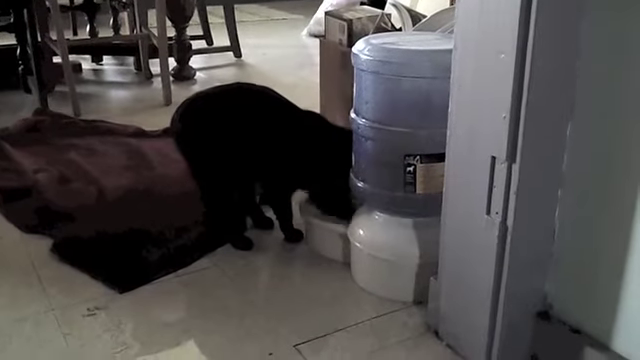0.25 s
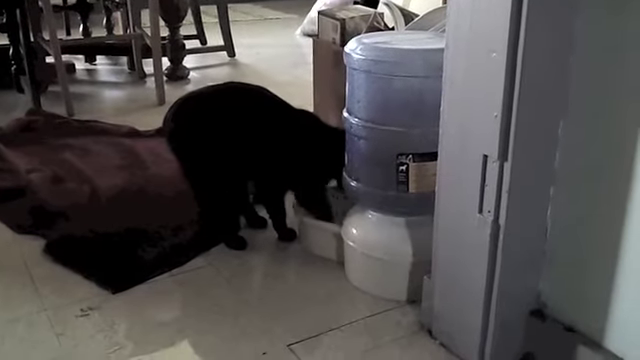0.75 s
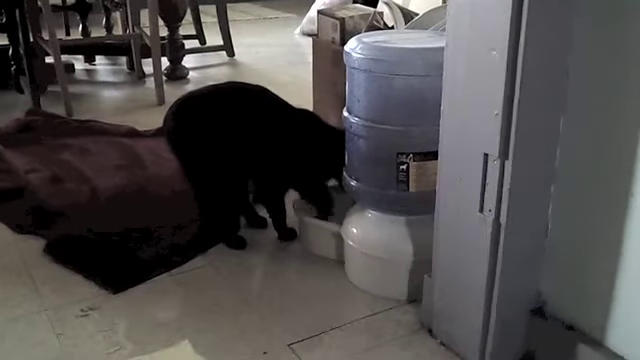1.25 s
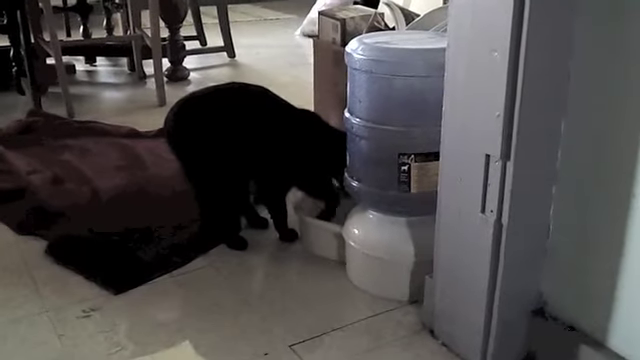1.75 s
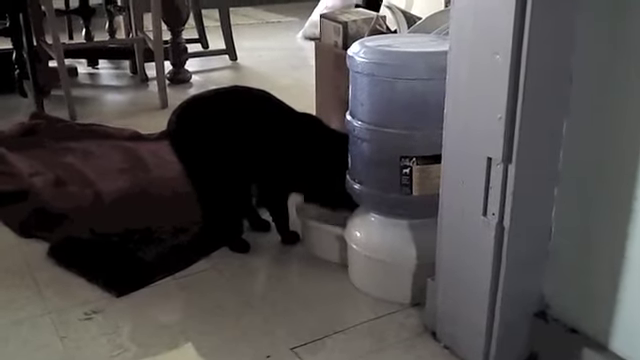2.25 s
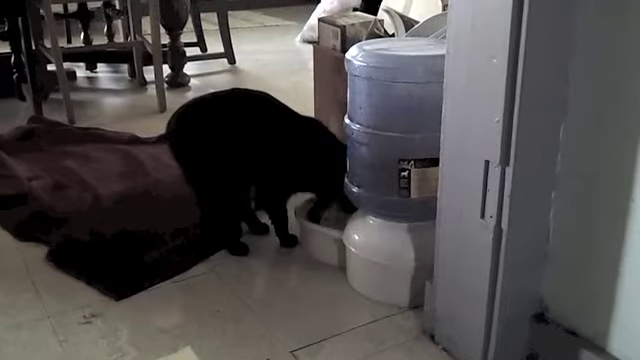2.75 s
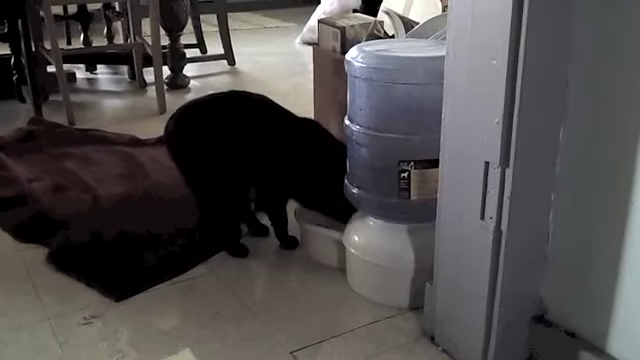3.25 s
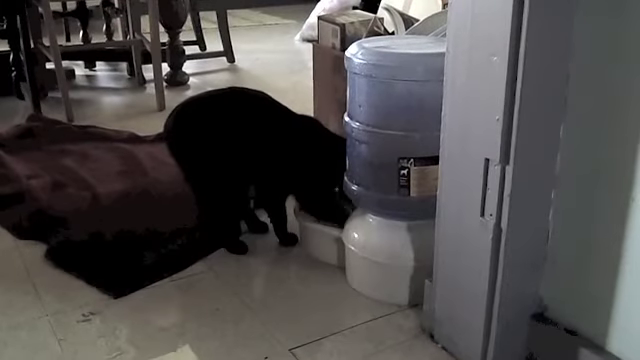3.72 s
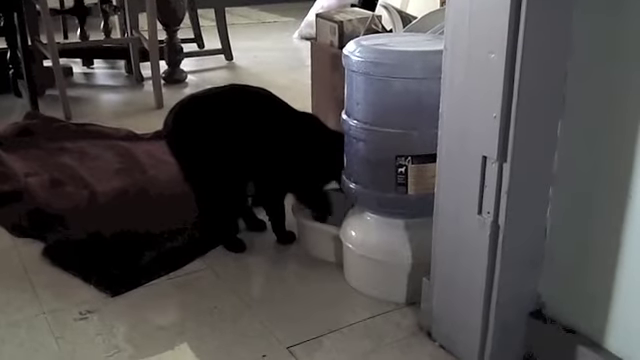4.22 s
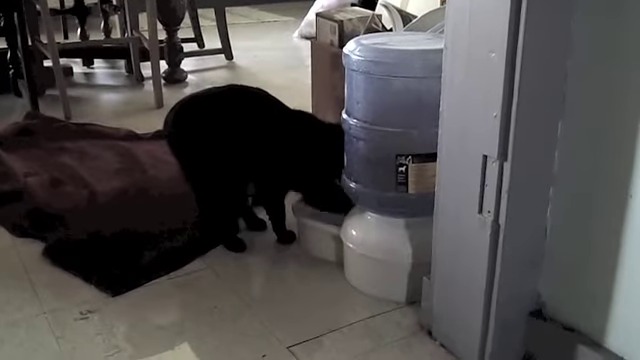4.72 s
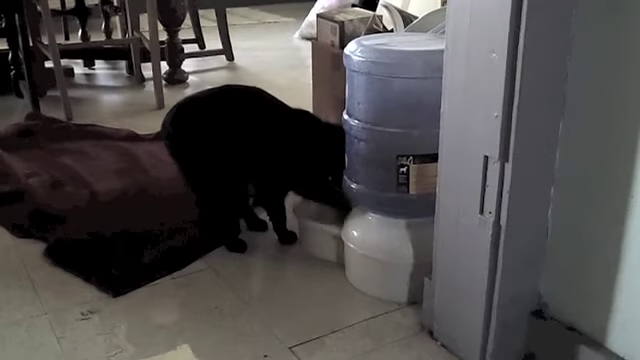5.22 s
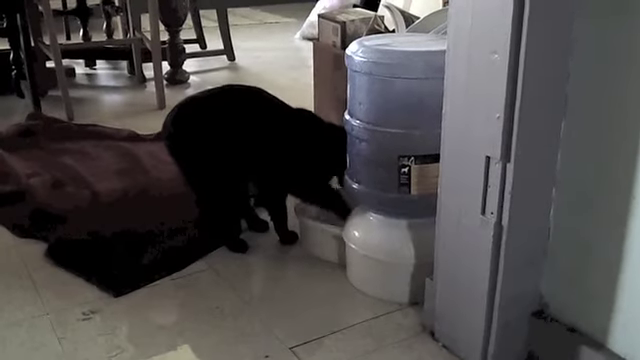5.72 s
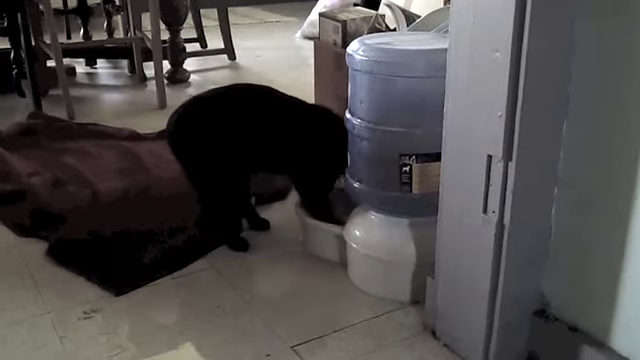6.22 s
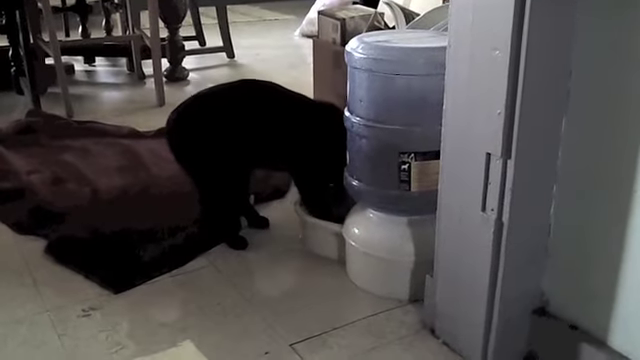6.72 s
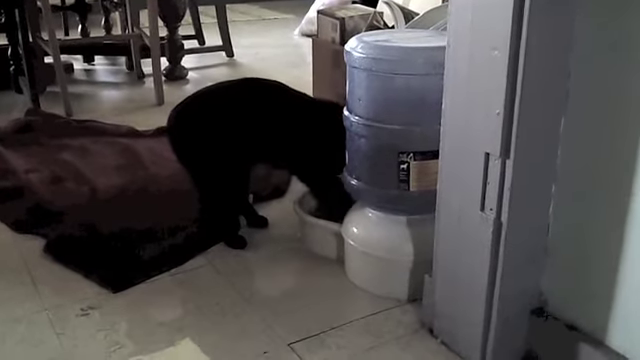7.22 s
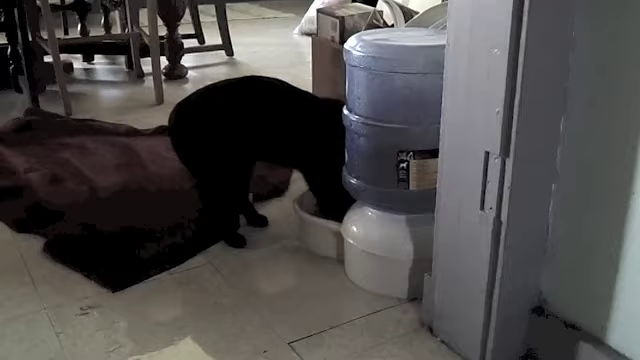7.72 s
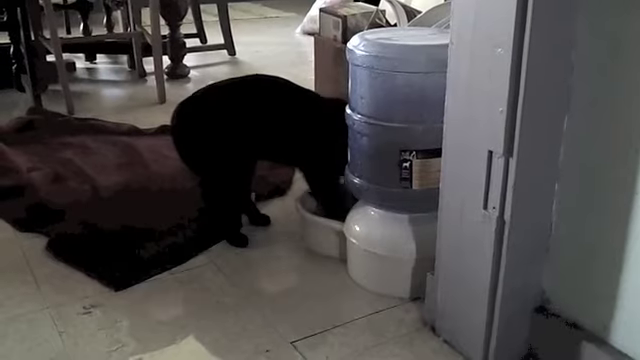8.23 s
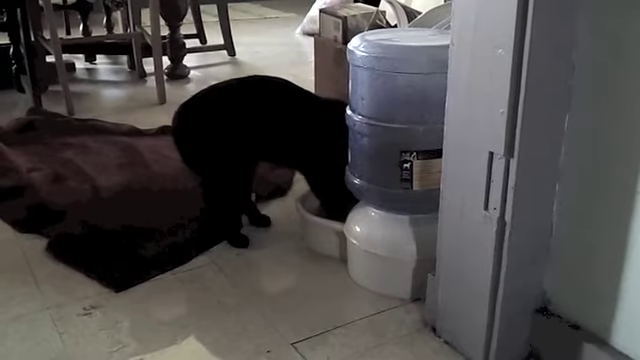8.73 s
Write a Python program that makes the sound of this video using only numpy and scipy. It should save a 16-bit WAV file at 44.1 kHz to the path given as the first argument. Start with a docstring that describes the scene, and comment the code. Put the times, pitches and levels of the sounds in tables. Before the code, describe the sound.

A cat paws at the water in a plastic dispenser bowl, making small irregular splashes, bubbly plops, drips and soft lapping. Three times its wet paw gives a brief squeak against the plastic. The splashing thins out, then picks up again, and air glugs into the bottle near the end. The microphone is close, in a small hard-walled kitchen with faint rumble and hiss.

```python
"""A cat paws at the water in the plastic bowl of a gravity water dispenser on a kitchen floor.
Each dip traps bubbles that plop, throws a little spray and sets the water lapping; three times the wet
paw rubs along the bowl. Near the end air glugs up into the bottle. One microphone, close to the bowl:
the small hard room answers behind the direct sound, over a faint rumble and hiss."""
import sys
import numpy as np
from scipy import signal
from scipy.fft import rfft, irfft, next_fast_len
from scipy.io import wavfile
from scipy.ndimage import uniform_filter1d

SR = 44100
rng = np.random.default_rng(int(sys.argv[2]) if len(sys.argv) > 2 else 0)


def generate_wav(sig):
    """Save sig (samples, or channels by samples) to the path in sys.argv[1] as 16-bit PCM at SR."""
    pcm = np.round(np.clip(np.atleast_2d(sig).T, -1, 1) * 32767).astype(np.int16)
    wavfile.write(sys.argv[1], SR, pcm)


N = 395559

# the paw breaks the surface: (time [s], relative level [dB], spray centre [Hz])
SPLASHES = [(0.3242, -40, 3500), (0.5384, -22.5, 1940), (0.5937, -33.5, 1800), (.7557, -37, 1920),
            (1.2509, -41, 1880), (1.3857, -36.5, 4040), (1.55, -35.5, 4930), (1.658, -46.5, 3300),
            (1.7925, -30, 1980), (1.809, -31, 1980), (1.983, -33, 1840), (2.044, -33.5, 1920),
            (2.2907, -38, 3000), (2.7063, -28.5, 1940), (2.953, -36.5, 2000), (3.1702, -40, 1980),
            (3.2866, -38, 2140), (3.3, -33.5, 1850), (3.613, -29, 3060), (3.8665, -40.5, 4980),
            (4.1692, -38.5, 1820), (4.1767, -33, 2040), (4.589, -34, 3460), (4.6414, -35.5, 1820),
            (4.7042, -34, 1860), (5.012, -39, 1840), (5.119, -39.5, 2150), (5.4272, -35, 4200),
            (5.5555, -42, 1950), (5.897, -38, 3020), (6.6388, -42, 2930), (7.479, -47, 3870),
            (7.913, -38.5, 1800), (8.1405, -31.5, 1830), (8.4947, -30, 3280), (8.5093, -26.5, 2400)]
TYPICAL_SPLASH_DB, TYPICAL_SPLASH_HZ = -33, 2000


def from_db(db):
    """Decibels to gain."""
    return 10 ** (np.asarray(db) / 20)


def rms_one(x):
    """Scale to rms 1."""
    return x / np.sqrt(np.mean(x ** 2) + 1e-20)


def even(x, size):
    """Hold the rms near 1 over windows of size samples."""
    return x / np.sqrt(np.abs(uniform_filter1d(x ** 2, size)) + 1e-12)


def clock(seconds):
    """Time axis of a short sound."""
    return np.arange(int(seconds * SR) + 2) / SR


def add(out, start, sound):
    """Mix a sound in at a time."""
    i = max(int(start * SR), 0)
    out[i:i + len(sound)] += sound[:max(N - i, 0)]


def swell_and_die(t, swell, t60):
    """Envelope that builds up smoothly and rings down; top 1."""
    envelope = (1 - np.exp(-(t / swell) ** 2)) * np.exp(-np.log(1000) * t / t60)
    return envelope / (envelope.max() + 1e-12)


def gains(table):
    """A smooth gain curve for each level column of (time [s], level [dB], ...), silent outside it."""
    t = np.arange(N) / SR
    times, *levels = np.transpose(table)
    inside = (t >= times[0]) & (t <= times[-1])
    curves = [inside * from_db(np.interp(t, times, level)) for level in levels]
    return uniform_filter1d(curves, size=400, axis=1)


def at_hz(spectrum, hz):
    """Gain of a spectrum at given frequencies."""
    known_hz, level = np.transpose(spectrum)
    return from_db(np.interp(np.log(hz + 1), np.log(known_hz), level))


def noise(spectrum):
    """Steady noise of a given colour, rms 1."""
    size = next_fast_len(N)
    colour = at_hz(spectrum, np.fft.rfftfreq(size, 1 / SR))
    return rms_one(irfft(rfft(rng.standard_normal(size)) * colour, size)[:N])


def resonate(x, hz, width):
    """One resonance, gain 1 on top."""
    r = np.exp(-np.pi * width / SR)
    feedback = [1, -2 * r * np.cos(2 * np.pi * hz / SR), r * r]
    return signal.lfilter(np.array([1, 0, -1]) * (1 - r * r) / 2, feedback, x)


def body(modes):
    """A body's modes under a dense random drive; filtering twice keeps the valleys dark."""
    drive = rng.standard_normal(N)
    ringing = sum(from_db(db) * resonate(resonate(drive, hz, 2 * width), hz, 2 * width)
                  for hz, width, db in modes)
    return even(ringing, size=1500)


def swarm(spectrum, per_s, cycles, spread_db, bands=30):
    """Countless small bubbles of random size, each ringing for some cycles; rms 1."""
    onsets = np.flatnonzero(rng.random(N) < per_s / SR)
    strength, polarity, pitch = rng.random((N, 3))[onsets].T
    kicks = from_db(spread_db * np.minimum(-np.log(1 - strength), 3)) * np.sign(polarity - .5)
    out = np.zeros(N)
    for band, hz in enumerate(np.geomspace(spectrum[0][0], spectrum[-1][0], bands)):
        clicks = np.full(N, 1e-18)
        clicks[onsets] += kicks * ((pitch * bands).astype(int) == band)
        out += at_hz(spectrum, hz) * resonate(clicks, hz, np.log(1000) / np.pi * hz / cycles)
    return rms_one(out)


def room_tone(floor_db=-61.5, flutter_db=-70.5, flutter_hz=30, centre_hz=3800, width_hz=2600):
    """Room rumble and microphone hiss; a band of the hiss pulses faintly."""
    # colour of the rumble and hiss: (frequency [Hz], relative level [dB])
    floor_colour = [(15, -12), (25, -20.5), (86, -0.5), (240, 0), (267, -0.5), (389, -5), (433, -3.5),
                    (804, -10), (1450, -18.5), (2300, -13.5), (2770, -18.5), (3930, -12.5), (4380, -21.5),
                    (6920, -16.5), (15500, -19)]
    pulse = .5 + .5 * np.cos(2 * np.pi * flutter_hz * np.arange(N) / SR)
    band = resonate(resonate(rng.standard_normal(N), centre_hz, width_hz), centre_hz, width_hz)
    return from_db(floor_db) * noise(floor_colour) + from_db(flutter_db) * rms_one(band * pulse)


def unrest(t60, follows=0.37, swell=0.0062):
    """Motion left in the water: each splash adds its share, which dies away; 1 after a typical splash."""
    power, t = np.zeros(N), clock(1)
    for s, db, _ in SPLASHES:
        motion = from_db(follows * (db - TYPICAL_SPLASH_DB)) * swell_and_die(t, swell, t60)
        add(power, s, motion ** 2)
    return np.sqrt(power)


def stirred_water(slosh_lap_db=-6.0, slosh_fizz_db=-14.0, unrest_db=-63.5):
    """The water laps and fizzes with its slow sloshing, and more just after each splash."""
    # slow sloshing in the bowl: (time [s], relative level [dB])
    slosh_levels = [(0.0, -48.5), (0.4, -57.5), (0.8, -51.5), (1.1, -57), (2.55, -53.5), (2.65, -54.5),
                    (3.02, -60.5), (3.25, -58), (3.42, -69), (3.7, -49.5), (4.05, -63), (4.27, -61),
                    (4.4, -56.5), (5.04, -54.5), (5.62, -59), (6.0, -68), (6.37, -70), (6.64, -63),
                    (7.39, -70.5), (7.92, -60.5), (8.09, -54.5), (8.54, -54), (8.89, -60), (8.97, -70)]
    # bubbles of the lapping: (frequency [Hz], relative level [dB])
    lap_colour = [(130, -9), (220, -3.5), (400, -5.5), (700, -9.5), (1200, 2.5), (1800, -4), (2400, -13.5),
                  (3200, -13)]
    # finer bubbles of the fizz: (frequency [Hz], relative level [dB])
    fizz_colour = [(1800, -21), (2500, 0), (3100, 19), (4300, 8), (5500, 9), (7500, -11), (12000, -53)]
    slosh, = gains(slosh_levels)
    lap_gain = np.hypot(from_db(slosh_lap_db) * slosh, from_db(unrest_db) * unrest(t60=0.36))
    fizz_gain = np.hypot(from_db(slosh_fizz_db) * slosh, from_db(unrest_db) * unrest(t60=0.3))
    lapping = swarm(lap_colour, per_s=750, cycles=30, spread_db=3.5)
    fizzing = swarm(fizz_colour, per_s=800, cycles=42, spread_db=5.0)
    return lap_gain * lapping + fizz_gain * fizzing


def spatter(droplets, start, samples, hz, octaves):
    """The droplets of one size range, from a given moment on; rms 1."""
    edges = np.clip(hz * 2 ** (np.array([-octaves, octaves]) / 2), 100, .45 * SR)
    stretch = np.take(droplets, int(start * SR) + np.arange(samples), mode="wrap")
    band = signal.sosfilt(signal.butter(2, edges, "band", fs=SR, output="sos"), stretch)
    return even(band, size=900)


def swishes(droplets, gain_db=0.5, octaves=1.52):
    """Water tears softly around the moving paw, swelling and fading with the stroke."""
    # paw strokes: (loudest moment [s], relative level [dB], half length [s], centre [Hz])
    strokes = [(0.06, -54.5, 0.061, 2680), (0.136, -54, 0.022, 1290), (0.338, -42, .009, 3300),
               (0.561, -43, 0.023, 1980), (0.78, -49.5, 0.019, 3220), (1.023, -57.5, 0.019, 2600),
               (1.266, -63, 0.0058, 2300), (1.468, -61.5, 0.017, 3220), (1.622, -53, 0.01, 2380),
               (1.748, -58, .025, 3000), (1.827, -55.5, 0.053, 1758), (2.257, -52, 0.046, 2470),
               (2.606, -54.5, .015, 2550), (2.727, -53.5, 0.029, 2800), (2.961, -45.5, 0.01, 5900),
               (3.223, -53.5, 0.03, 2800), (3.588, -49.5, .015, 2800), (3.997, -55, 0.034, 2400),
               (4.315, -53, 0.042, 2330), (4.606, -55.5, 0.022, 3670), (4.704, -56.5, 0.031, 2360),
               (4.961, -61, 0.01, 12500), (5.047, -55, 0.061, 2240), (5.25, -61.5, .017, 3300),
               (5.61, -54, 0.041, 2360), (6.645, -53, 0.013, 2230), (7.919, -47.5, 0.0064, 1700),
               (8.141, -55, 0.008, 3960), (8.29, -57.5, 0.018, 2620), (8.392, -49.5, 0.016, 2840),
               (8.506, -57, 0.018, 2400), (8.797, -58.5, 0.012, 2170), (8.872, -61, 0.014, 4000)]
    out, t = np.zeros(N), clock(.3)
    middle = t[-1] / 2
    for s, db, half_length, hz in strokes:
        envelope = np.exp(-((t - middle) / half_length) ** 2 / 2)
        add(out, s - middle, from_db(db + gain_db) * envelope * spatter(droplets, s, len(t), hz, octaves))
    return out


def bubble(hz, t60, swell_cycles=1.29):
    """A trapped bubble rings; its pitch climbs as it nears the surface, faster the smaller it is."""
    swell = swell_cycles / hz
    t = clock(t60 + 2 * swell)
    octaves_per_s = 2.93 * (hz / 1400) ** 2
    pitch = hz * 2 ** np.minimum(octaves_per_s * t, .5)
    return np.sin(2 * np.pi * np.cumsum(pitch) / SR) * swell_and_die(t, swell, t60)


def plops(gain_db=1.0, satellite_db=-10.5, satellite_cycles=16, count=4):
    """The larger bubbles; each sheds a few weaker ones of other sizes just after it closes."""
    # single bubbles in the bowl: (time [s], starting pitch [Hz], relative peak [dB], ring t60 [s])
    bubbles = [(0.1151, 1430, -32.5, .014), (.175, 3250, -41.5, 0.024), (0.1916, 4720, -42.5, .011),
               (0.2812, 1237, -36, 0.023), (0.3235, 1320, -34.5, 0.016), (0.325, 3560, -32, 0.01),
               (0.341, 3000, -42, .025), (0.35, 1366, -31, 0.02), (0.396, 1750, -40, 0.012),
               (.538, 1426, -23.5, .03), (.549, 1448, -22.5, 0.029), (.542, 895, -36, 0.0082),
               (.564, 1380, -36, .02), (.756, 4400, -41, 0.0056), (.805, 4200, -40, 0.0074),
               (.856, 3000, -35.5, 0.018), (.864, 3460, -37, .016), (.889, 2130, -38, 0.014),
               (.903, 6160, -47.5, .009), (.942, 840, -40.5, 0.042), (.974, 840, -38.5, 0.0052),
               (1.008, 1280, -42, 0.013), (1.2885, 1810, -39.5, 0.011), (1.356, 2900, -40, .018),
               (1.359, 1690, -37, .004), (1.396, 4360, -44, .011), (1.513, 1950, -48.5, 0.06),
               (1.5519, 5150, -34, 0.011), (1.5542, 1130, -36.5, 0.0088), (1.793, 1370, -27, 0.011),
               (1.7948, 1020, -21, 0.014), (1.845, 924, -33, 0.0057), (1.8697, 4700, -49, .015),
               (1.959, 3150, -41, 0.0063), (1.984, 564.5, -35.5, 0.11), (2.047, 1416, -31.5, 0.04),
               (2.2024, 2900, -39, 0.014), (2.21, 3320, -36, 0.014), (2.2644, 1680, -29.5, 0.02),
               (2.2883, 1850, -37, 0.032), (2.293, 3150, -33.5, .008), (2.294, 4570, -44, .01),
               (2.4256, 1280, -46, 0.012), (2.434, 695, -40.5, 0.017), (2.7137, 1050, -31.5, 0.0095),
               (2.749, 1960, -38.5, 0.017), (2.7807, 2600, -31.5, 0.0036), (2.92, 4800, -41, 0.0068),
               (2.945, 1240, -26.5, 0.0073), (2.9456, 1890, -19, 0.012), (2.9594, 7700, -50, 0.0097),
               (3.294, 5770, -49, .012), (3.302, 1390, -31, 0.012), (3.611, 1238, -38, .038),
               (3.6162, 3130, -30, 0.01), (3.7402, 1350, -39, .033), (3.746, 816, -39.5, 0.031),
               (3.8386, 1143, -29, 0.012), (3.87, 5000, -39, 0.0072), (3.879, 860, -39, 0.014),
               (3.989, 1274, -38, 0.044), (3.997, 4050, -41.5, 0.02), (4.1783, 2980, -33, 0.019),
               (4.1783, 1485, -23.5, 0.0043), (4.2573, 3300, -42.5, .01), (4.262, 4650, -46, 0.0087),
               (4.3784, 5300, -46, .008), (4.428, 1820, -47, 0.029), (4.491, 1990, -49, 0.039),
               (4.556, 1640, -43.5, .025), (4.583, 567, -28.5, 0.064), (4.6124, 1460, -36.5, 0.078),
               (4.6836, 1340, -41, 0.039), (4.7065, 1526, -34.5, 0.026), (4.719, 1380, -27, 0.012),
               (4.8265, 1310, -48, .012), (4.948, 2940, -44.5, .019), (4.9608, 1290, -33, .016),
               (4.9818, 1910, -38, .015), (5.011, 1680, -27, 0.021), (5.1188, 2020, -32.5, 0.041),
               (5.143, 1660, -40, 0.037), (5.2578, 3160, -38, 0.011), (5.3434, 1160, -55, 0.023),
               (5.4273, 3900, -34.5, 0.012), (5.674, 4470, -48, .012), (5.7014, 1760, -31.5, 0.0053),
               (5.8562, 3460, -41, .006), (6.692, 1630, -43, .028), (6.756, 593, -44.5, .016),
               (6.7824, 990, -43.5, .038), (7.622, 1720, -54, .026), (7.866, 4100, -39.5, 0.0055),
               (7.9177, 1260, -35, .012), (7.925, 1820, -33, .009), (7.993, 1086, -28, 0.041),
               (8.141, 1230, -28, 0.027), (8.157, 1160, -29.5, 0.015), (8.191, 1140, -38, 0.0064),
               (8.2743, 6700, -40, 0.0042), (8.281, 2950, -42.5, .009), (8.329, 3180, -36.5, .018),
               (8.37, 1250, -44, 0.049), (8.3924, 3000, -27, 0.0034), (8.3932, 4360, -35.5, 0.013),
               (8.459, 736, -38.5, 0.0095), (8.499, 3440, -30, .005), (8.5154, 1255, -28.5, .014),
               (8.547, 600, -31.5, 0.007), (8.7472, 4660, -39.5, 0.0081)]
    out = np.zeros(N)
    for (s, hz, db, t60), satellites in zip(bubbles, rng.random((len(bubbles), count, 3))):
        add(out, s, from_db(db + gain_db) * bubble(hz, t60))
        for delay, pitch, weakness in satellites:
            satellite_hz = max(hz, 900) * 2 ** (1.4 * pitch - .6)
            satellite = bubble(satellite_hz, satellite_cycles / satellite_hz)
            add(out, s + .002 + .022 * delay ** 2, from_db(db + satellite_db - 6 * weakness) * satellite)
    return out


def splashes(droplets, spray_db=-10.0, octaves=2.45, typical_knock_db=-50):
    """The paw throws a short burst of spray and hands a dull knock to the bowl."""
    # the bowl's knock: (frequency [Hz], relative level [dB])
    knock_colour = [(30, -50), (70, -28), (130, -0.5), (220, 4.5), (400, 1), (800, 0.5), (1600, -7),
                    (4000, -60)]
    out, t, knock_noise = np.zeros(N), clock(.2), noise(knock_colour)
    for s, db, hz in SPLASHES:
        spray = spatter(droplets, s, len(t), hz, octaves) * swell_and_die(t, swell=0.0016, t60=0.054)
        knock = np.take(knock_noise, int(s * SR) + np.arange(len(t)), mode="wrap")
        knock *= swell_and_die(t, swell=0.003, t60=0.14)
        # the knock grows more slowly than the spray and is weaker under fine spray
        knock_db = typical_knock_db + 0.86 * (db - TYPICAL_SPLASH_DB) - 5 * np.log2(hz / TYPICAL_SPLASH_HZ)
        add(out, s, from_db(db + spray_db) * spray + from_db(knock_db) * knock)
    return out


def drips(level_db=-53.0, spread_db=3.0, longest_fall_s=.28, low_hz=2800, high_hz=6200, cycles=45):
    """A drop thrown up by each splash falls back a moment later with a tiny chirp."""
    out = np.zeros(N)
    for (s, _, _), (delay, pitch, strength) in zip(SPLASHES, rng.random((len(SPLASHES), 3))):
        hz = low_hz * (high_hz / low_hz) ** pitch
        db = level_db + spread_db * (2 * strength - 1)
        add(out, s + longest_fall_s * delay, from_db(db) * bubble(hz, cycles / hz))
    return out


def gurgles(flutter_hz=110):
    """An air pocket rings, fed unevenly by the moving water, and glides as it shrinks or grows."""
    # trapped air: (time [s], length [s], first pitch [Hz], last pitch [Hz], level [dB])
    pockets = [(1.041, 0.053, 1100, 814, -54.5), (1.434, 0.078, 820, 1510, -53),
               (2.247, 0.052, 601, 660, -44), (2.367, 0.033, 780, 895, -53),
               (2.904, 0.037, 1260, 1400, -50), (5.284, 0.082, 1380, 1066, -53.5),
               (6.74, 0.0204, 520, 616, -49.5), (8.609, 0.086, 420.5, 290, -46.5),
               (8.785, 0.069, 2080, 2530, -56)]
    out = np.zeros(N)
    for s, length, first_hz, last_hz, db in pockets:
        t = clock(length)
        phase = 2 * np.pi * np.cumsum(first_hz * (last_hz / first_hz) ** (t / length)) / SR
        feed = uniform_filter1d(rng.standard_normal((2, SR)), int(SR / flutter_hz), axis=1)[:, :len(t)]
        note = rms_one(feed[0] * np.cos(phase) + feed[1] * np.sin(phase))
        add(out, s, from_db(db) * note * np.sin(np.pi * t / length))
    return out


def rub_envelope(fall_db_per_s, late_s=0, rise_db_per_s=400):
    """The pad grips, holds and lets go, once for every rub."""
    # paw on the bowl's wall: (time of grip [s], relative level [dB], hold [s])
    rubs = [(2.524, -39, 0.045), (3.442, -39.5, 0.04), (8.001, -40.5, 0.044)]
    out, t = np.zeros(N), np.arange(N) / SR - late_s
    for s, db, hold in rubs:
        attack_db = rise_db_per_s * np.clip(s - t, 0, 1)
        release_db = fall_db_per_s * np.clip(t - s - hold, 0, 2)
        out += from_db(db - attack_db - release_db)
    return out


def rubbing(low_db=-0.5, high_db=-3.0, rasp_db=-6.5):
    """The wet pad sticks and slips on the plastic: two wavering notes, and a rasp as it slides off."""
    # the two notes of the rubbed wall: (frequency [Hz], width [Hz], relative level [dB])
    low_note, high_note = [(671, 24, 2.5), (520, 42, -17), (860, 48, -12.5)], [(1030, 42, 0)]
    # higher modes of the bowl: (frequency [Hz], width [Hz], relative level [dB])
    bowl_modes = [(1230, 250, 0.5), (1390, 160, -27), (1950, 132, 1), (2300, 130, -10)]
    squeak = from_db(low_db) * body(low_note) + from_db(high_db) * body(high_note)
    rasp = from_db(rasp_db) * body(bowl_modes)
    return rub_envelope(fall_db_per_s=314) * squeak + rub_envelope(fall_db_per_s=90, late_s=0.0093) * rasp


def step(start_s=5.975, hz=58, peak_db=-59):
    """A soft low thud as the cat shifts its weight."""
    out, t = np.zeros(N), clock(.3)
    thud = np.sin(2 * np.pi * hz * t) * swell_and_die(t, swell=0.013, t60=.2)
    add(out, start_s, from_db(peak_db) * thud)
    return out


def glug(churn_db=2.0):
    """A large bubble pulses as it enters the bottle; the water churns behind it."""
    # air entering the bottle: (time [s], bubble level [dB], relative churn level [dB])
    glug_levels = [(8.54, -60, -62), (8.552, -48, -44), (8.562, -51, -55), (8.586, -74, -53.5),
                   (8.614, -42.5, -42.5), (8.776, -47.5, -62), (8.798, -82, -72), (8.874, -63, -54.5),
                   (8.93, -87, -84)]
    # note of the large bubble: (time [s], pitch [Hz])
    glug_pitch = [(8.55, 215.4), (8.62, 186.6), (8.66, 264), (8.70, 224), (8.74, 214), (8.78, 235)]
    # the bottle and the water in it: (frequency [Hz], width [Hz], relative level [dB])
    bottle_modes = [(140, 46, 0.5), (290, 92, 2), (388, 17, -4), (615, 58, 4.5), (791, 32, 5.5),
                    (1100, 120, -7.5), (2050, 170, -7.5)]
    bubble_gain, churn_gain = gains(glug_levels)
    hz = np.interp(np.arange(N) / SR, *np.transpose(glug_pitch))
    note = np.sqrt(2) * np.sin(2 * np.pi * np.cumsum(hz) / SR)
    return bubble_gain * note + from_db(churn_db) * churn_gain * body(bottle_modes)


def kitchen(x, near_db=-6.0, near_t60=0.066, tail_db=-10.0, tail_t60=0.24, bass_hz=200, treble_hz=5500):
    """At the microphone: direct sound, scatter from the corner by the bowl, reflections and room tail."""
    # floor, door and walls: (delay [s], relative level [dB])
    reflections = [(.007, -25.5), (0.014, -8), (0.016, -19.5), (.031, -16)]
    t = clock(.6)
    response = np.zeros(len(t))
    arrivals = [(0, near_db, 0.0027, near_t60), (0, tail_db, 0.028, tail_t60)]
    arrivals += [(delay, db, .0002, .004) for delay, db in reflections]
    for delay, db, swell, t60 in arrivals:
        scatter = rng.standard_normal(len(t)) * swell_and_die(np.maximum(t - delay, 0), swell, t60)
        response += from_db(db) * scatter / np.linalg.norm(scatter)
    # bass escapes through the doorway, treble is soaked up
    response = signal.lfilter(*signal.butter(1, [bass_hz, treble_hz], "band", fs=SR), response)
    return x + signal.fftconvolve(x, response)[:N]


def scene():
    """The dispenser sounds through the kitchen, with the cat's step and the room tone added; mono."""
    # droplets in the spray and the paw's wake: (frequency [Hz], relative level [dB])
    droplet_colour = [(600, 10), (1500, 6.5), (3500, 2.5), (5200, -5), (7000, -13), (14000, -21)]
    spray = swarm(droplet_colour, per_s=4000, cycles=14, spread_db=5.0)
    wake = swarm(droplet_colour, per_s=1800, cycles=26, spread_db=4.5)
    water = plops() + splashes(spray) + drips() + swishes(wake) + stirred_water() + gurgles()
    dispenser = water + rubbing() + glug()
    return (kitchen(dispenser) + step() + room_tone())[None]


def record(dry, whine_hz=15372, whine_db=-83.0, notch_hz=7690, notch_q=27.0, cutoff_hz=15800):
    """The electronics behind the microphone add a faint whine, notch one narrow band and cut the top."""
    whine = from_db(whine_db) * np.sqrt(2) * np.sin(2 * np.pi * whine_hz * np.arange(N) / SR)
    notched = signal.lfilter(*signal.iirnotch(notch_hz, notch_q, fs=SR), dry + whine)
    return signal.sosfilt(signal.ellip(12, .1, 70, cutoff_hz, fs=SR, output="sos"), notched)


dry = scene()
out = record(dry)
generate_wav(out)
```